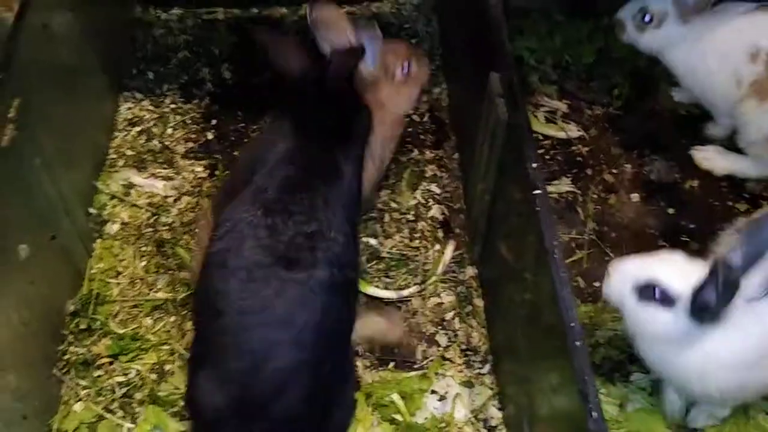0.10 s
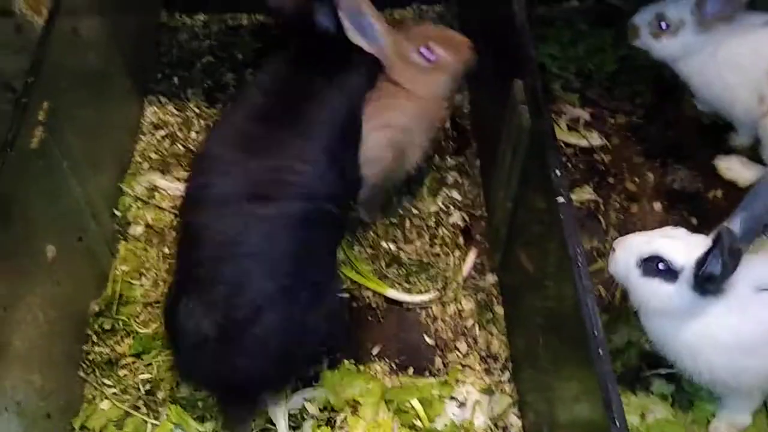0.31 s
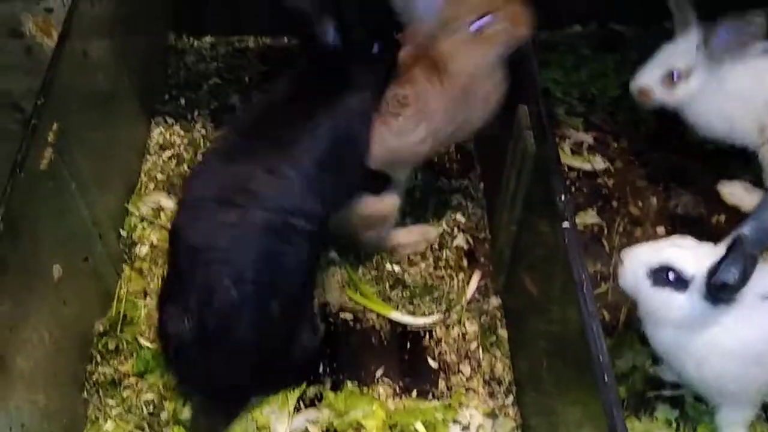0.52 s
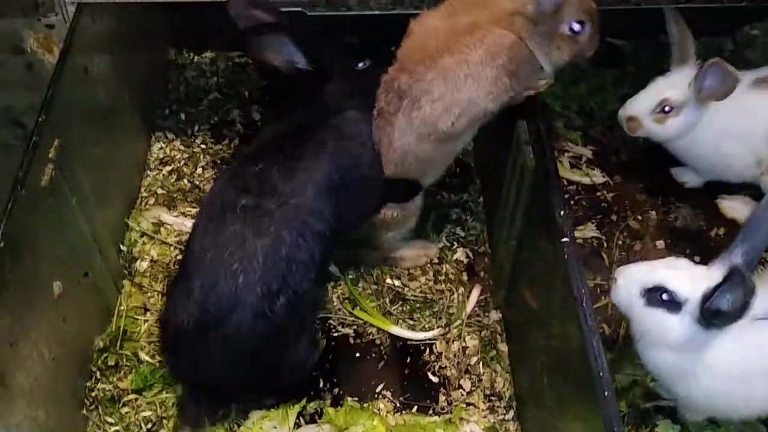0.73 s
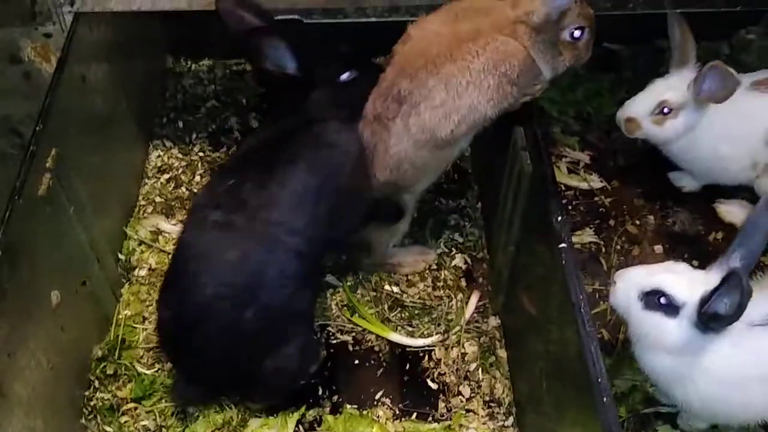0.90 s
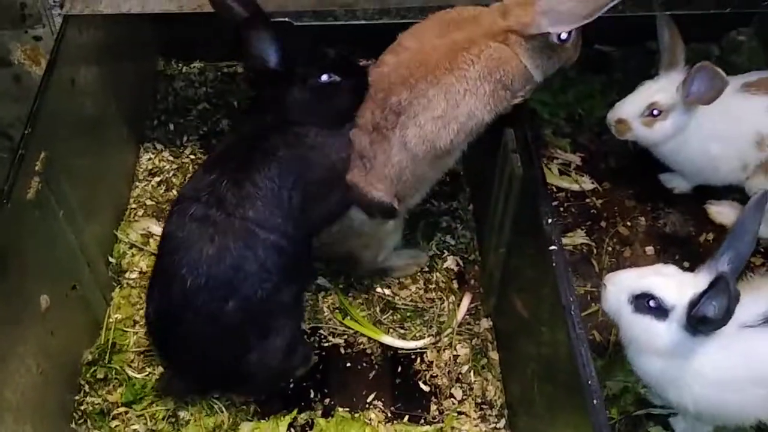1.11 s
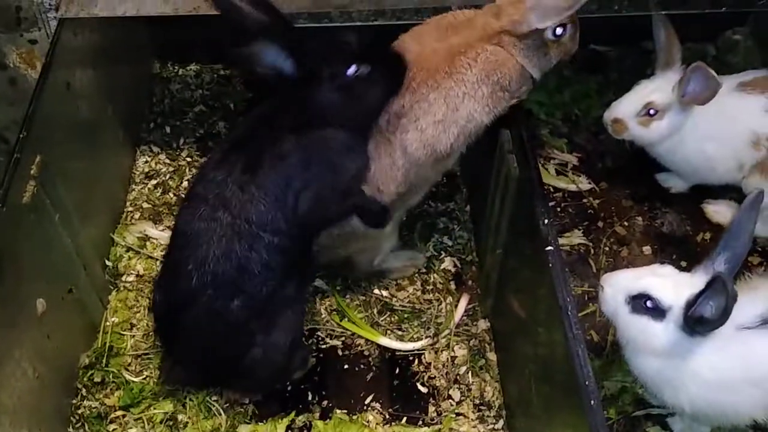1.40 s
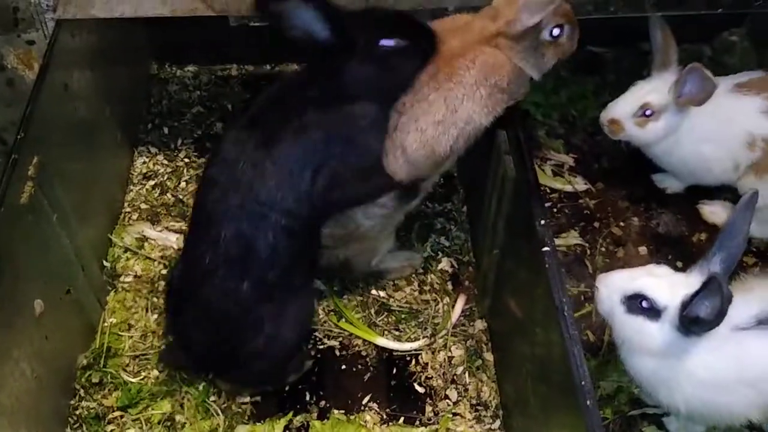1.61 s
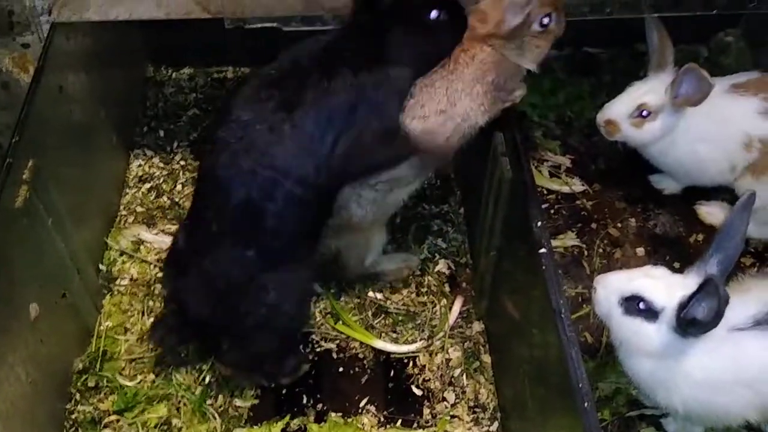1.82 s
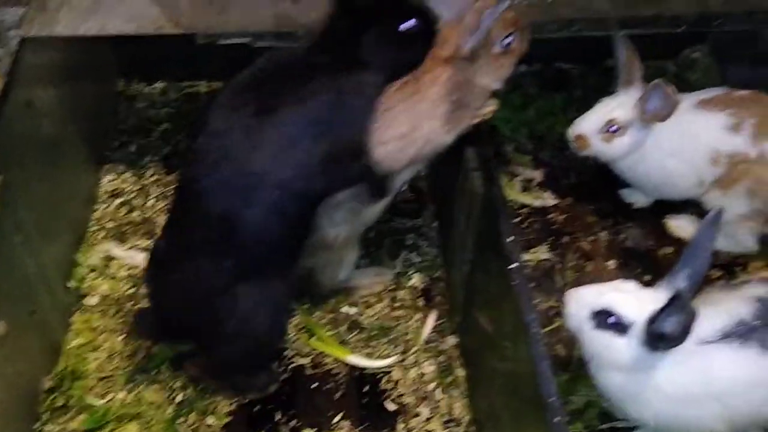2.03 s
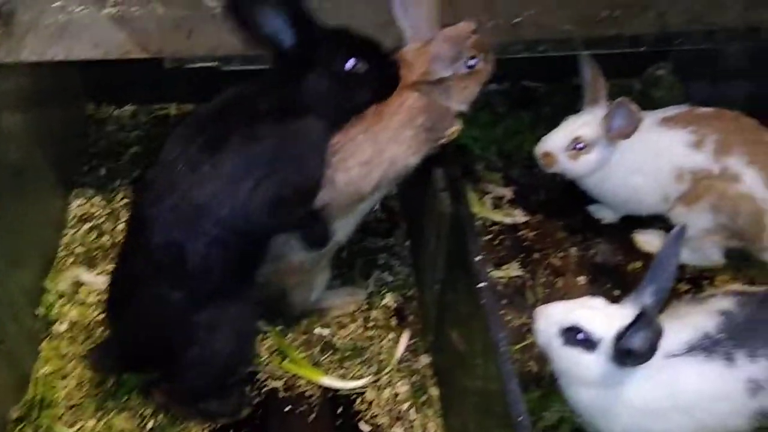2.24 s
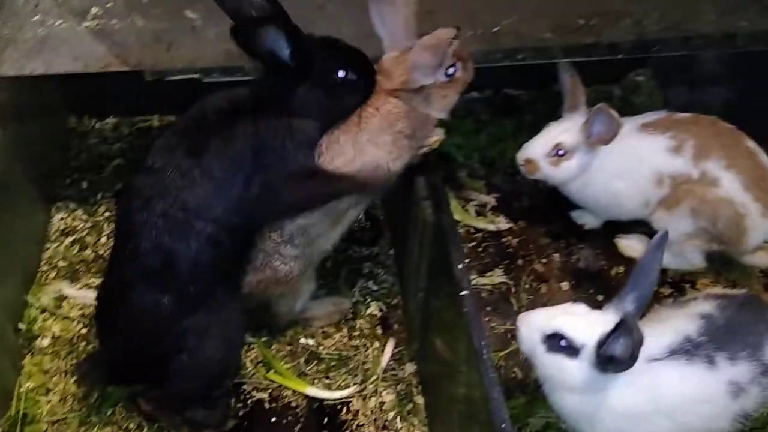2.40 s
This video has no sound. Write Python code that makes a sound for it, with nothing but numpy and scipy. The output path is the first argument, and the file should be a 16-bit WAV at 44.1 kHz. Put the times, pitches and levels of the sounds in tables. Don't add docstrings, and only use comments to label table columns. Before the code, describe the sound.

Rabbit feet thudding on a hollow board floor with scuffing shavings, then one sharp panel crack

```python
import sys
import numpy as np
from scipy import signal
from scipy.fft import rfft, irfft
from scipy.io import wavfile

SR = 44100
rng = np.random.default_rng(int(sys.argv[2]) if len(sys.argv) > 2 else 0)


def master_out(mix):
    frames = np.transpose(np.atleast_2d(mix))
    ceiling = np.clip(frames, -1, 1)
    pcm = np.round(ceiling * 32767).astype(np.int16)
    wavfile.write(sys.argv[1], SR, pcm)


def elevation(decibels):
    levels = np.asarray(decibels, float)
    return 10 ** (levels / 20)


N = 114660
T = np.arange(N) / SR
FREQS = np.fft.rfftfreq(N, 1 / SR)
WALL_MODES = rng.standard_normal(3000)


def rms_one(x):
    return x / np.sqrt(np.mean(x ** 2) + 1e-20)


def at_hz(points, hz):
    table = np.array(points)
    return np.interp(np.log(hz), np.log(table[:, 0]), table[:, 1])


def coloured(x, spectrum):
    hz = np.maximum(FREQS, 1)
    octaves_below = np.log2(np.maximum(spectrum[0][0] / hz, 1))
    octaves_above = np.log2(np.maximum(hz / spectrum[-1][0], 1))
    gain_db = at_hz(spectrum, hz) - 24 * (octaves_below + octaves_above)
    return rms_one(irfft(rfft(x) * elevation(gain_db), N))


def stereo_white():
    # hz, likeness (-1 to 1)
    likeness = [(25, 0.85), (125, 0.94), (300, .9), (600, 0.52), (1200, -0.18), (8000, 0.24)]
    alike = np.clip(at_hz(likeness, np.maximum(FREQS, 1)), -1, 1)
    mid, side = rfft(rng.standard_normal((2, N)))
    return irfft(np.sqrt(1 + alike) * mid + np.sqrt(1 - alike) * side * [[1], [-1]], N)


def pan(db):
    return elevation(np.array([[db / 2], [-db / 2]]))


def fade_in(start_s, length_s):
    return np.clip((T - start_s) / length_s, 0, 1)


def burst(start_s, rise_s, t60_s):
    u = np.maximum(T - start_s, 0)
    rise = np.minimum(u / max(rise_s, 1e-4), 1)
    return rise * np.exp(-np.log(1000) * np.maximum(u - rise_s, 0) / max(t60_s, .01))


def ring(start_s, hz, t60_s):
    u = np.maximum(T - start_s, 0)
    return (T > start_s) * np.sin(2 * np.pi * hz * u) * np.exp(-np.log(1000) * u / t60_s)


def drift(rate_hz):
    return np.interp(T * rate_hz, np.arange(400), rng.standard_normal(400)) * 1.2


def through_panel(x, depth):
    mode_spacing_hz, ripple_db = 22, 4
    ripple = np.interp(FREQS / mode_spacing_hz, np.arange(3000), WALL_MODES)
    return rms_one(irfft(rfft(x) * elevation(depth * ripple_db * ripple), N))


def thumps():
    # start_s, peak_db, tilt_db_per_octave (rising with pitch, modes below 260 Hz only),
    # damping_factor, swell_s
    footfalls = [(0.018, -41.5, 5, 1.54, 0.0035), (0.071, -44.5, 9.5, 0.62, 0.01),
                 (0.187, -33, -3, 1.9, 0.0085), (0.205, -40, 27, 0.63, 0.0027),
                 (0.2166, -19, 7.5, 1.02, 0.0049), (0.2303, -30.5, 14, 1.26, 0.0042),
                 (0.274, -31, -7, 0.89, 0.0086), (0.389, -42, 2.5, 0.51, 0.0136),
                 (.488, -31, 9, 0.6, 0.0089), (0.506, -26, -13, 0.79, 0.01), (.581, -24, 4, 0.88, 0.0047),
                 (.594, -24.5, 15, 1.48, 0.00713), (.662, -37, -9, 0.7, 0.0088),
                 (0.771, -37.5, -20, 0.89, 0.0095), (0.956, -37, -17, 0.8, 0.0025),
                 (.992, -41.5, -9, 1.8, 0.0051), (1.073, -64, 1, 0.86, 0.0036),
                 (1.41, -55.5, 5.5, 0.43, 0.0032), (2.076, -53, -27, 1.06, 0.0073),
                 (2.1517, -22.5, -10, 0.99, 0.0052), (2.16, -28, -10, 0.81, 0.0051),
                 (2.1844, -26, 6, 3, 0.0064), (2.366, -68.5, -12.5, 1.67, 0.014),
                 (2.55, -65.5, 8, 3, 0.0056)]
    # pitch_hz, level_db, t60_s
    board_modes = [(112.7, -1.5, 0.31), (139.58, 5.5, 0.31), (171.8, -3, 0.26), (208.3, 3, .2),
                   (235.5, -6, 0.12), (290, -28, 0.15), (343.6, -22, 0.35), (383.5, -18.5, 0.13),
                   (510, -27.5, 0.21), (702, -27.5, 0.13), (1020, -22, 0.13), (1280, -32.5, .12)]
    strike_spread_db, side_db, left_lag_s = 1.5, -24, .00012
    out = np.zeros((2, N + SR))
    lean = elevation(side_db) * rng.standard_normal(len(board_modes))
    mixes = rng.standard_normal((40, len(board_modes)))
    u = np.arange(SR // 2) / SR
    for (s, db, tilt, damp, swell), mix in zip(footfalls, mixes):
        i = int(s * SR)
        rise = 1 - np.exp(-(u / max(swell, .001)) ** 2)
        for (hz, level_db, t60), side, own in zip(board_modes, lean, mix):
            tilt_db = tilt * np.log2(hz / 150) * (hz < 260)
            gain = elevation(db - 9.5 + level_db + tilt_db + strike_spread_db * own)
            fall = np.exp(-np.log(1000) * u * damp / t60)
            mode = np.sign(hz - 260) * gain * rise * np.cos(2 * np.pi * hz * (u - swell)) * fall
            out[:, i:i + len(u)] += mode * [[1 + side], [1 - side]]
    low_cut = signal.butter(2, 95, "high", fs=SR, output="sos")
    left, right = signal.sosfilt(low_cut, out[:, :N])
    left = np.interp(T - left_lag_s, T, left)
    return np.array([left, right]) * pan(2.2)


def wall():
    # start_s, peak_db, damping_factor
    knocks = [(.188, -64, 0.87), (.214, -44, 1.3), (.287, -73, 1.6), (.39, -61, 1.1), (.494, -49, 0.96),
              (.583, -47, 0.71), (.602, -43, 1.36), (.964, -72, 0.69), (2.16, -39.5, 2.4)]
    # pitch_hz, level_db, t60_s
    wall_modes = [(471, -4.5, 0.12), (509.7, 0.5, 0.19), (557, -20.5, .12)]
    out = np.zeros(N)
    for s, db, damp in knocks:
        swell = fade_in(s, .007)
        for hz, level_db, t60 in wall_modes:
            out += elevation(db + level_db) * ring(s, hz, t60 / max(damp, .3)) * swell
    return out * pan(0)


def scuffs():
    # start_s, hiss_db, knock_db (relative to hiss), rise_s, t60_s
    strokes = [(-.02, -60, 3, 0.0075, 0.19), (.008, -58, -6.5, 0.014, 0.17),
               (0.055, -58.5, -4, 0.0015, 0.34), (0.158, -61, -31, 0.0033, 0.68),
               (0.184, -53.5, 0, 0.016, 0.29), (0.252, -56, -13, 0.0026, 0.11),
               (0.277, -52, -2, 0.0076, 0.29), (.305, -52, -15, 0.012, 0.16),
               (0.355, -50, -6, 0.0014, 0.29), (0.382, -64.5, 17.5, 0.0021, 0.079),
               (0.426, -55.5, -2.5, 0.038, 0.36), (0.479, -41, -10, 0.0042, 0.087),
               (.505, -57, -3.5, .01, 0.25), (0.572, -54, -9, .0003, 0.097), (.582, -59, -8, .004, 0.27),
               (0.592, -65.5, 9.5, 0.00074, 0.065), (.622, -63.5, 2, 0.00092, 0.23),
               (0.658, -67, -21, 0.0027, 0.68), (.735, -64.5, -7, 0.0039, 0.46),
               (0.779, -68.5, -0.5, 0.0033, 0.078), (0.878, -74.5, -2.5, 0.0019, 0.39),
               (0.918, -60, -29, 0.0019, 0.23), (0.945, -59, -4.5, 0.005, 0.29),
               (1.098, -94.5, 18, 0.0071, 0.58)]
    # hz, level_db (per Hz)
    hiss_sound = [(1180, -38), (2000, -18), (2600, -21.5), (3100, -12), (6380, -11), (8620, -5.5),
                  (13400, -5), (15600, -12.5)]
    # hz, level_db (per Hz)
    knock_sound = [(500, 0), (800, -1.5), (1300, -4), (2300, -4.5), (3500, -14), (6000, -18)]
    grains_per_s, grain_spread_db, grain_share = 3000, 4, .4
    sizes = elevation(grain_spread_db * np.minimum(rng.exponential(1, (2, N)), 4))
    sizes = sizes * rng.choice([-1, 1], (2, N))
    grains = rms_one(sizes * (rng.random((2, N)) < grains_per_s / SR))
    smooth = through_panel(rng.standard_normal((2, N)), 1.2)
    hiss = coloured(np.sqrt(grain_share) * grains + np.sqrt(1 - grain_share) * smooth, hiss_sound)
    knock = coloured(through_panel(stereo_white(), .45), knock_sound)
    hiss_power, knock_power = np.zeros(N), np.zeros(N)
    for s, db, knock_db, rise, t60 in strokes:
        hiss_power += (elevation(db) * burst(s, rise, t60)) ** 2
        knock_power += (elevation(db + knock_db) * burst(s, rise, 1.64 * t60)) ** 2
    return np.sqrt(hiss_power) * hiss * pan(5) + np.sqrt(knock_power) * knock * pan(.5)


def claws():
    # start_s, peak_db, pitch_hz
    claw_ticks = [(.1615, -57, 13000), (0.357, -37, 9300), (.361, -42.5, 2270), (0.3845, -52, 1270),
                  (.3915, -63, 2200), (0.4784, -39, 8700), (0.489, -31, 8300), (0.5728, -45, 11000),
                  (0.593, -48, 11000), (.625, -59, 10300), (.7352, -60, 9000), (.9213, -57, 10100),
                  (0.9465, -53, 8000)]
    cycles = 6.0
    return sum(elevation(db) * ring(s, hz, cycles / hz) for s, db, hz in claw_ticks) * pan(5.5)


def crack():
    # start_s, level_db
    hits = [
        (2.1080, -9),
        (2.1095, -15),
        (2.1103, -14),
    ]
    # hz, level_db (per Hz)
    tail_sound = [(520, -34.5), (1100, -28.5), (1600, -16.5), (1950, -9), (2500, -7.5), (3700, -12.5),
                  (7000, -11), (10500, -9), (15600, -18.5)]
    # hz, t60_s
    tail_t60 = [(900, 0.65), (1900, 0.17), (4000, 0.19), (8000, 0.13), (14000, 0.11)]
    # hz, left_minus_right_db
    tail_pan = [(800, -3.5), (2400, -2), (5000, 1), (9000, 4), (14000, 7.5)]
    # pitch_hz, level_db, t60_s
    panel_hums = [(1523, -47, .17), (1910, -68, 0.82), (2194, -35, 0.13), (2518, -35, 0.16),
                  (6126, -44, .14), (6352, -41.5, .15), (6657, -49.5, .15), (8129, -38, 0.14),
                  (8507, -43.5, 0.17), (9100, -42.5, .13), (10040, -43.5, .15), (10440, -40, .13),
                  (11040, -36.5, .13)]
    # pitch_hz, level_db, t60_s
    loose_modes = [(1039, -50, .4), (1083, -54, .5), (1104, -53, .6), (1123, -49, .56), (1151, -52, .52),
                   (1187, -56, .5), (1244, -58, .45)]
    tail_db, late_db, late_t60_s = -24.5, -19, .39
    build_s = np.array([[.001], [.015]])
    start = hits[0][0]

    ticks = sum(elevation(db) * ring(s, 10500, .0009) for s, db in hits) * [[1], [.15]]
    ticks = signal.sosfilt(signal.butter(2, 4500, "high", fs=SR, output="sos"), ticks)
    drone = sum(elevation(db) * ring(start, hz, t60) for hz, db, t60 in loose_modes)
    drone = drone * fade_in(start, .008) * [[-.15], [1.05]]

    noise = rfft(coloured(through_panel(rng.standard_normal((2, N)), .45), tail_sound))
    centres = 800 * 2 ** np.arange(0, 4.6, .5)
    octaves = np.log2(np.clip(FREQS, centres[0], centres[-1]))
    tail = 0
    for hz in centres:
        band = irfft(noise * np.maximum(1 - 2 * abs(octaves - np.log2(hz)), 0), N)
        fall = burst(start, 0, at_hz(tail_t60, hz)) + elevation(late_db) * burst(start, 0, late_t60_s)
        tail = tail + band * fall * pan(at_hz(tail_pan, hz))

    hum = 0
    for hz, db, t60 in panel_hums:
        right = -.2 if hz < 1600 else .4
        hum = hum + elevation(db) * ring(start, hz, t60) * [[1], [right]]
    build = 1 - np.exp(-np.maximum(T - start + .0004, 0) / build_s)
    return ticks + drone + build * (elevation(tail_db) * tail + hum)


def sway():
    # time_s, level_db
    sway_level = [(0, -54), (.3, -62.5), (.54, -48), (.6, -55), (.66, -58), (.77, -49), (.87, -77),
                  (.95, -51), (1.1, -73), (1.4, -62.5), (1.8, -62), (2.05, -74.5), (2.2, -60.5),
                  (2.34, -79), (2.6, -77)]
    # hz, level_db (per Hz)
    sway_sound = [(28, -3), (45, -4), (62, -4.5)]
    level = elevation(np.interp(T, *np.transpose(sway_level)))
    return level * coloured(stereo_white(), sway_sound) * pan(1.0)


def pings():
    # start_s, pitch_hz, level_db, length_s
    far_pings = [(0.005, 1020, -59.5, 0.04), (0.778, 1211, -68.5, 0.029), (1.16, 1470, -84.5, 0.17),
                 (1.22, 1123, -81.5, 0.085), (1.4, 1520, -80.5, 0.055), (1.505, 1530, -76, 0.045),
                 (1.447, 2050, -91, .05), (1.475, 2700, -90.5, .015), (1.22, 2542, -86, 0.054),
                 (1.553, 2060, -91, 0.097), (1.573, 1140, -86, 0.084), (2.006, 1230, -76, 0.0075),
                 (2.036, 1560, -89, 0.074), (2.57, 1552, -84, .03)]
    half_width_hz = 60
    out = np.zeros((2, N))
    for s, hz, db, length in far_pings:
        sos = signal.butter(1, [hz - half_width_hz, hz + half_width_hz], "band", fs=SR, output="sos")
        tone = rms_one(signal.sosfilt(np.vstack([sos, sos]), rng.standard_normal((2, N))))
        shape = fade_in(s, .008) * np.exp(-np.maximum(T - s - length, 0) / .014)
        out += elevation(db) * tone * shape * elevation(3.5 * drift(50))
    return out


def air():
    # hz, level_db (per Hz)
    air_sound = [(25, -8), (45, -3), (70, -5.5), (124, -5), (210, -11.5), (280, -18.5), (600, -45.5),
                 (3000, -51.5)]
    # time_s, level_db
    stir_level = [(0, -61.5), (.3, -66), (.45, -63), (.6, -60.5), (.85, -61), (1.2, -70), (1.32, -84),
                  (1.42, -71.5), (1.55, -72.5), (1.7, -72.5), (2.0, -88.5), (2.16, -58), (2.25, -60.5),
                  (2.42, -96), (2.5, -82.5), (2.6, -70)]
    # hz, level_db (per Hz)
    stir_sound = [(200, 2.5), (320, 5), (520, 1), (750, -13), (1500, -16)]
    stir_db = np.interp(T, *np.transpose(stir_level)) + 2.5 * drift(25.32)
    stirring = elevation(stir_db) * coloured(stereo_white(), stir_sound)
    gusts_db = 2.5 * drift(22)
    rumble = elevation(-57.5 + gusts_db) * coloured(stereo_white(), air_sound) * pan(1.0)
    mic_hiss = elevation(-83) * rng.standard_normal((2, N))
    return rumble + stirring + mic_hiss


def scene():
    return thumps() + wall() + scuffs() + claws() + crack() + sway() + pings() + air()


def roll_off(x):
    return signal.sosfilt(signal.butter(12, 16530, fs=SR, output="sos"), x)


def record(dry):
    top_cut = signal.cheby2(20, 50, 15750, fs=SR, output="sos")
    return roll_off(signal.sosfilt(top_cut, dry))


dry = scene()
out = record(dry)
master_out(out)
```